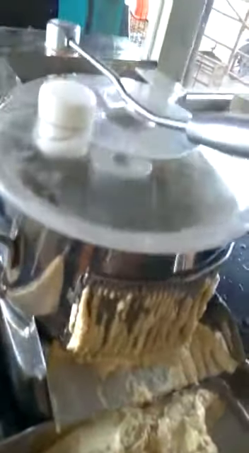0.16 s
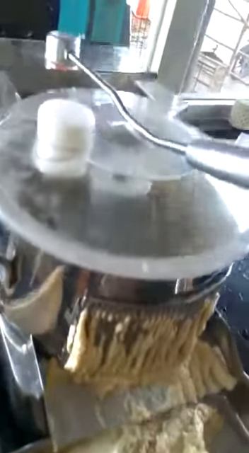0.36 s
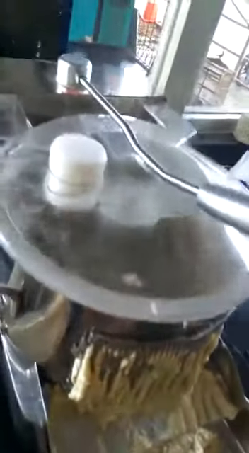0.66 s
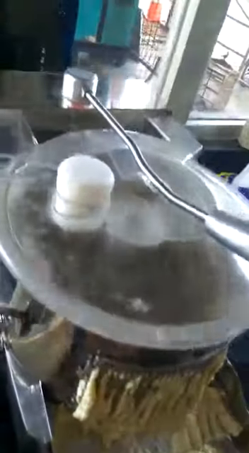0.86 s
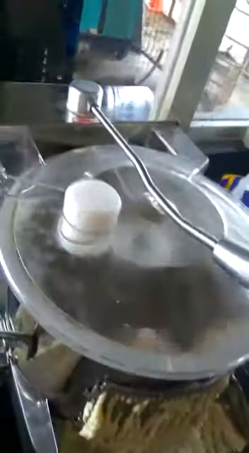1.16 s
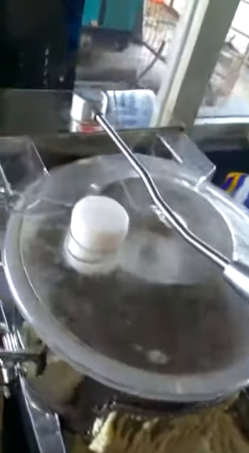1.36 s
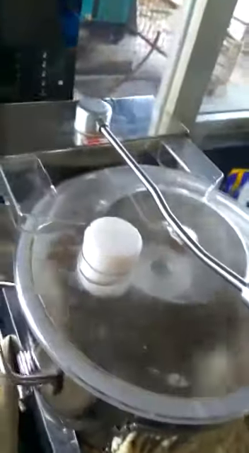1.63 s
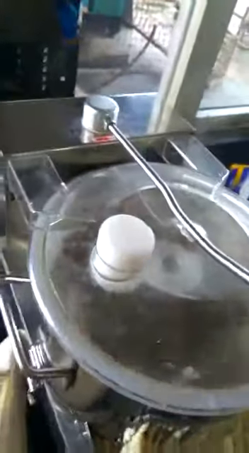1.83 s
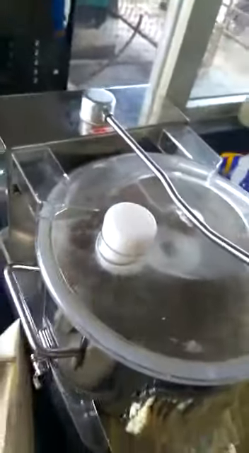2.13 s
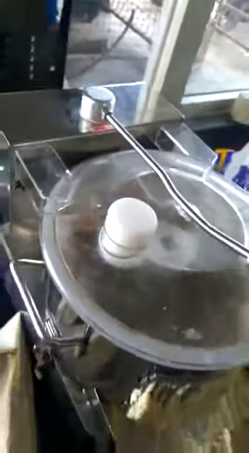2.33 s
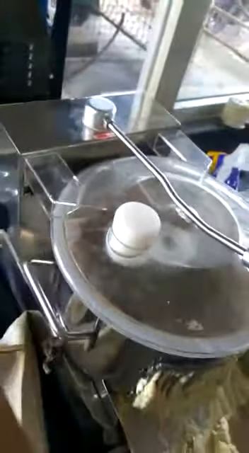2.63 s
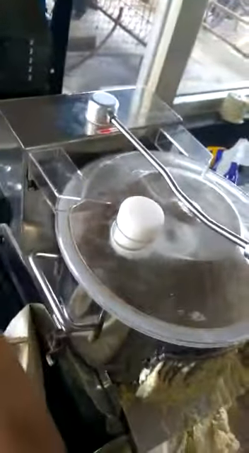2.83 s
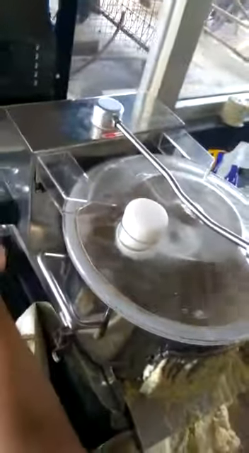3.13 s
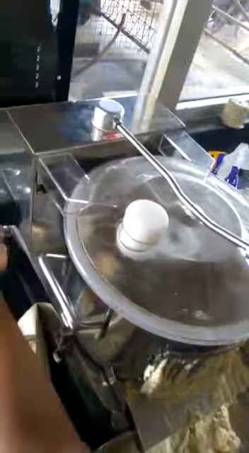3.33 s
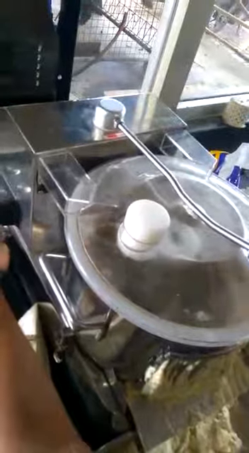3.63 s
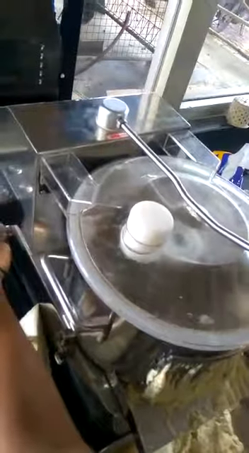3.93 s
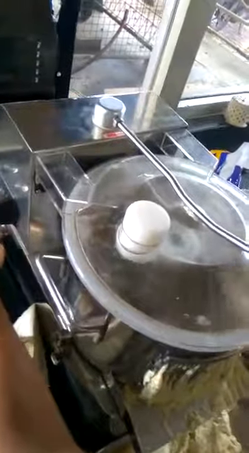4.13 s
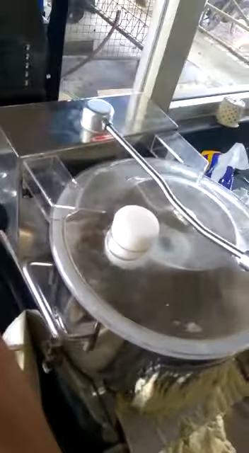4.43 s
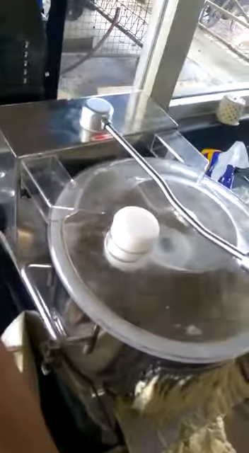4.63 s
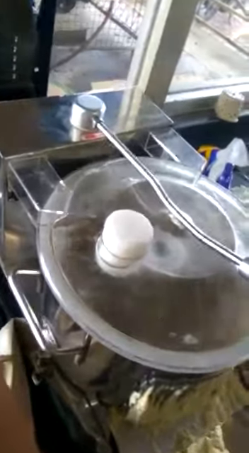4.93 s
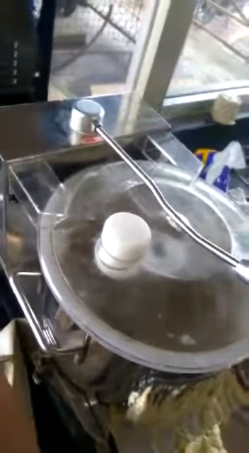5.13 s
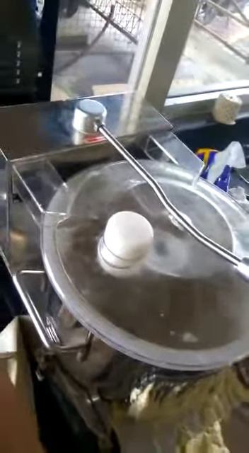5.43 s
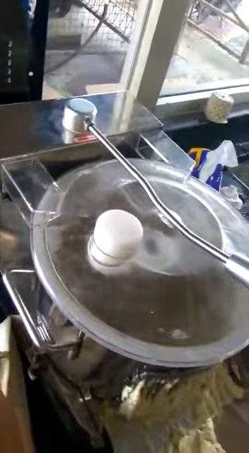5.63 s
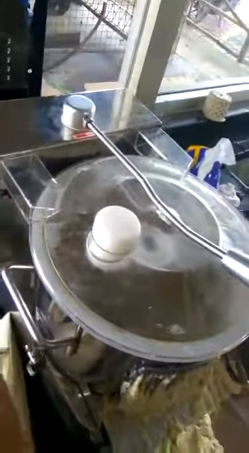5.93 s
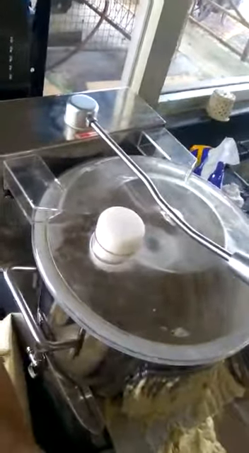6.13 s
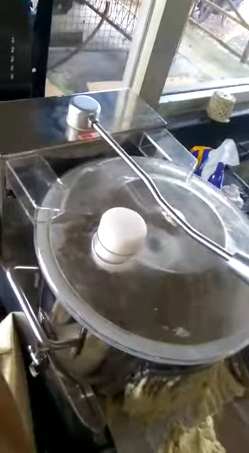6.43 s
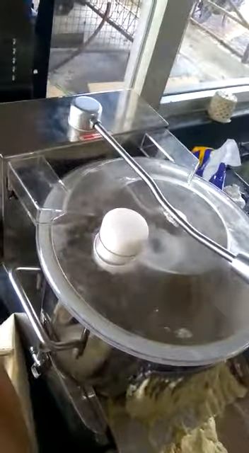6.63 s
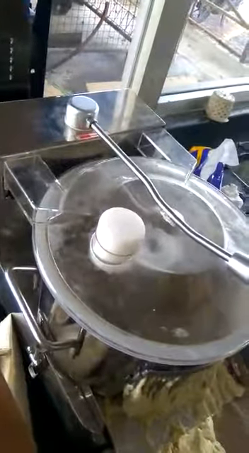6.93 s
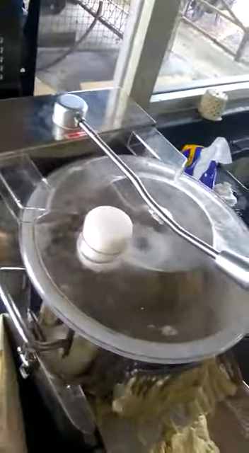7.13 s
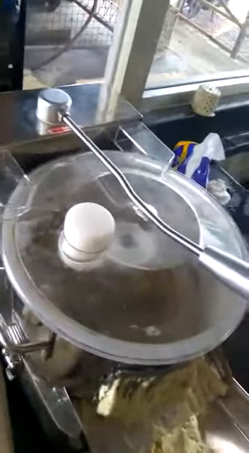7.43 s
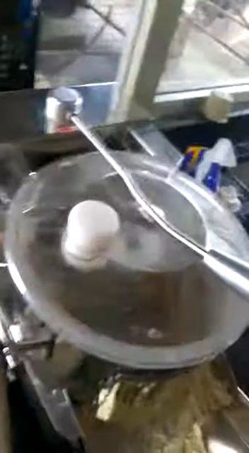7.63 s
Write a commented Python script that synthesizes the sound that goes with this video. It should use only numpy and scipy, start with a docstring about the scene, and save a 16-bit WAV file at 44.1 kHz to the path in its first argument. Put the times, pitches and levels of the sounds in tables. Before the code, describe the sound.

Wet pulp tumbles, slaps and ticks inside a ringing steel drum over the loud low hum of a nearby motor, and the housing booms now and then. The load grows quieter, leaving mostly hum. After a few last knocks the machine is switched off with a click and dies away at once. A small metallic snap follows, then only a quiet room with distant traffic and a very faint electronic whine.

```python
"""In a quiet room, a mains motor turns a paddle that pushes pulp through a screen in a steel drum.
The motor's coils hum at multiples of the mains frequency and its gears whirr. Lumps tumble and knock,
making the drum ring; the housing booms, loose bits clatter, and wet pulp spatters and ticks.
Near the end a switch clicks and the motor stops, leaving distant traffic and a thin electronic whine."""
import sys
import numpy as np
from scipy import signal
from scipy.fft import rfft, irfft, next_fast_len
from scipy.io import wavfile

SR = 44100
rng = np.random.default_rng(int(sys.argv[2]) if len(sys.argv) > 2 else 0)


def file_out(sig):
    """Save sig as 16-bit WAV at sys.argv[1]."""
    # one column per channel
    cols = np.atleast_2d(sig).T
    # limit, then scale
    lim = np.clip(cols, -1, 1)
    pcm = np.round(lim * 32767).astype(np.int16)
    wavfile.write(sys.argv[1], SR, pcm)


N = 343098
OFF_S, RUNDOWN_T60 = 6.711, 0.18  # switch-off; a t60 is the seconds a sound takes to fade by 60 dB
LEAD_S = 0.00016  # the left channel hears the drum first
SWEEP_RISE_S, SWEEP_FALL_S, LURCH_RISE_S = 0.03, 0.033, 0.021

# Table levels are relative: the functions add their own gains. Pan is left level minus right level.
# lumps striking the wall: t/s, level/dB, favoured f/Hz, slap compared with the knock/dB
KNOCKS = [(0.123, -16, 845, -12), (0.16, -13.5, 850, -12), (0.237, -15.5, 730, -16), (0.268, -16, 875, -14),
          (0.296, -20, 520, -17), (0.401, -8.5, 570, -7), (0.404, -8, 1020, -16), (0.489, -20.5, 457, -15),
          (0.494, -8.5, 810, -10), (0.55, -17.5, 540, -3.5), (0.582, -24, 537, 1.5),
          (0.667, -14.5, 610, -9), (0.706, -10.5, 860, -18), (0.768, -14, 840, -20), (0.82, -17, 544, -13),
          (0.855, -11, 510, -9), (0.916, -12.5, 570, -6), (0.982, -16, 525, -2), (1.02, -26, 565, -18),
          (1.041, -14, 533, -16), (1.081, -13, 674, -16), (1.093, -24, 513, 4), (1.124, -15, 452, -13),
          (1.154, -9, 807, -10), (1.177, -9, 870, -5), (1.241, -5, 554, -30), (1.251, -17, 477, -17),
          (1.299, -11, 477, -12), (1.339, -26, 560, -5), (1.392, -8, 1024, -16), (1.397, -10, 498, -10),
          (1.483, -35, 660, -12), (1.517, -11, 800, -20), (1.538, -15, 820, -12), (1.599, -17, 530, -17),
          (1.83, -7, 488, -9), (1.879, -13, 744, -16), (1.996, -17, 550, -16), (2.056, -13, 507, -12),
          (2.255, -12, 537, -12), (2.295, -11, 483, -15), (2.41, -12, 770, -15.5), (2.46, -13.5, 820, -11),
          (2.504, -36, 514, -11), (2.539, -13, 560, -23), (2.592, -16, 592, -4), (2.673, -9.5, 516, -20),
          (2.723, -12, 510, -27), (2.802, -14, 493, -25), (2.832, -15, 474, -25), (3.024, -10, 543, -10.5),
          (3.066, -7, 466, -20), (3.078, -9, 514, -18), (3.135, -19, 495, -23), (3.198, -13.5, 535, -11),
          (3.34, -10.5, 546, -15), (3.532, -17, 455, -23), (3.584, -8, 805, -19), (3.674, -12, 805, -19),
          (3.752, -15, 506, -15), (3.8, -15, 810, -20), (3.853, -10, 484, -24), (3.882, -6.5, 505, -22),
          (4.028, -8.5, 560, -20), (4.116, -16, 493, -9), (4.137, -13, 517, -14), (4.199, -17, 696, -3),
          (4.283, -13.5, 814, -18), (4.328, -15.5, 813, -14), (4.358, -17, 820, -8), (4.409, -13, 870, -12),
          (4.464, -13, 830, -9), (4.497, -17, 487, -8), (4.552, -11.5, 500, -25), (4.582, -10.5, 500, -25),
          (4.623, -21, 785, -16), (4.713, -21, 520, -4), (4.766, -17, 520, -15), (5.034, -21, 444, -17),
          (6.644, -18, 480, -27), (6.659, -15, 565, -27), (6.689, -16, 503, -14)]
# the tones at which the steel drum rings: f/Hz, width/Hz, level/dB
DRUM_MODES = [(250.4, 20, -3.5), (274.2, 21, 4.5), (300.5, 16, 2.5), (364.2, 11.8, 3), (385.4, 11, -6.5),
              (417, 35.5, -2.5), (458, 42.5, -1), (537, 37, 2.5), (706, 67, -5), (793.3, 21.5, 0),
              (846, 66, -6.5), (984, 71, -5), (1188, 225, -12.5), (1460, 710, -23), (2190, 480, -26)]
# how much pulp is in the drum, heard between sweeps: t/s, level/dB
LOAD = [(0, -0.5), (1.3, 3.5), (2.1, 2.5), (3.4, 1), (4.4, 1), (4.75, -0.5), (5.1, -7), (6.1, -7.5),
        (6.7, -6.5)]
# the paddle sweeps pulp round the wall: t/s, tumbling level/dB, spatter level/dB
SWEEPS = [(0.037, -20.5, -37.5), (0.15, -23, -37.5), (0.297, -23, -39), (0.411, -23.5, -42.5),
          (0.505, -21, -41.5), (0.609, -27, -41), (0.712, -25.5, -43), (0.821, -22, -41),
          (0.927, -23, -40.5), (1.047, -24, -37), (1.169, -20, -36.5), (1.1, -18.5, -39.5),
          (1.253, -18, -38.5), (1.3, -22, -41), (1.401, -24.5, -43.5), (1.517, -23, -40.5),
          (1.669, -21.5, -38), (1.759, -19.5, -40.5), (1.868, -19, -35.5), (2.023, -20.5, -42.5),
          (2.179, -28, -58), (2.305, -21.5, -42.5), (2.41, -25.5, -41.5), (2.558, -20.5, -42),
          (2.694, -21, -43), (2.804, -22, -41.5), (2.914, -27, -44.5), (3.077, -20, -40), (3.294, -24, -46),
          (3.361, -21, -39.5), (3.478, -23, -47.5), (3.613, -20.5, -42), (3.804, -29, -47.5),
          (3.885, -20, -37.5), (4.022, -24, -44), (4.153, -22, -45), (4.292, -23.5, -45.5),
          (4.423, -22, -40.5), (4.588, -25.5, -41.5), (4.733, -28.5, -69.5), (4.895, -30.5, -57),
          (5.042, -52, -59), (5.2, -43, -54), (5.399, -29, -52.5), (5.964, -38, -52), (6.4, -46, -58),
          (6.665, -39, -51)]
# the mass of pulp lurches: t/s, level/dB
LURCHES = [(0.0, -13.5), (0.43, -36), (0.58, -44), (0.72, -17), (1.21, -14), (1.47, -19), (1.871, -28),
           (2.12, -24), (2.441, -10), (2.53, -18), (2.64, -22), (2.72, -25), (3.034, -14.5), (3.12, -18),
           (3.341, -15), (3.831, -23), (3.89, -20), (4.02, -25), (4.44, -25), (4.63, -26), (4.76, -23.5),
           (5.05, -34), (5.761, -34), (5.92, -23), (6.685, -20)]


def hum():
    """The coils' magnetic pull hums at multiples of the mains frequency and collapses at switch-off."""
    # loudness of the hum: t/s, level/dB
    loudness = [(0, -13.5), (.2, -12.5), (.5, -14.5), (.9, -15), (1.05, -12), (1.48, -16.5), (1.65, -12.5),
                (1.75, -16), (2.5, -16), (2.78, -17), (2.9, -16.5), (3.7, -18), (3.88, -17), (4.2, -19),
                (4.6, -16.5), (4.75, -17.5), (5.4, -15), (5.56, -17.5), (6.05, -15.5), (6.7, -16.5)]
    # weak tones beside the strong fourth multiple: multiple of the mains, level/dB
    overtones = [(1, -40.5), (2, -36), (3, -23.5), (5, -30), (6, -23), (7, -20), (8, -19.5), (11, -31.5),
                 (14, -28.5), (15, -52)]
    # the microphone swings round the motor: t/s, left lead/radians, pan/dB
    swing = [(0, .13, .3), (1.3, .2, .4), (1.8, .26, 1.2), (3.2, .33, 1.0), (7, .34, 1.3)]
    mains_hz, side = 49.98, np.array([[.5], [-.5]])
    phase = 2 * np.pi * mains_hz * np.arange(N) / SR
    weak = 0
    for k, db in overtones:
        weak += amp(db + 2.14 * wander(19)) * np.sin(k * phase + 0.9 * wander(8) + 2 * np.pi * rng.random())
    weak = np.array([weak, np.roll(weak, round(LEAD_S * SR))])
    strong = np.sin(4 * phase + side * curve(swing)) * pan(curve(swing, column=2))
    level = np.sqrt(2) * amp(curve(loudness) + 0.6 * wander(9))
    collapse = rundown(t60=0.04)
    room_tail = amp(-7) * (rundown(t60=0.33) - collapse)
    return level * (collapse + room_tail) * (strong + amp(-1.5) * weak)


def drum(tumbling):
    """Tumbling pulp and single lumps make the drum ring; the wall under each lump also thuds."""
    tumble = tumbling * np.sqrt(0.5 + 0.5 * bumps(per_s=170, spread_db=2.6, fall_s=0.0052))
    blows, thuds, t = np.zeros((2, N)), np.zeros(N), np.arange(800) / SR
    for s, db, hz, _ in KNOCKS:
        tone = np.sin(2 * np.pi * hz * t)  # where a lump lands favours the drum tones near hz
        wet_scatter = 1.5 * rng.standard_normal((2, len(t))) * np.exp(-t / 0.0055)
        add_at(blows, s, amp(db - 14.5) * (tone * np.exp(-t / 0.003) + wet_scatter))
        add_at(thuds, s, amp(db - 5) * fade(t, t60=0.045) * tone)
    shell = stereo_noise(tumble, lambda hz: modes(DRUM_MODES, hz), (230, 1500), LEAD_S, blows)
    return shell + thuds * pan(0.8)


def stirring():
    """How hard the pulp tumbles: more at each sweep, less while a lump flies towards the wall."""
    stirred = swells(SWEEPS, curve(LOAD) - 29, SWEEP_RISE_S, SWEEP_FALL_S)
    flight_s, dip_depth = 0.015, 0.37
    landings = np.zeros(N)
    landings[(np.array(KNOCKS)[:, 0] * SR).astype(int)] = 1
    dip = np.sin(np.pi * np.linspace(0, 1, round(flight_s * SR)) ** 2)
    in_flight = signal.oaconvolve(landings, dip)[len(dip) - 1:]  # each dip ends at its knock
    return stirred * (1 - dip_depth * np.minimum(in_flight, 1))


def boom():
    """The housing rumbles under the load, swells at each lurch and rings on after switch-off."""
    # the low tones of the housing: f/Hz, width/Hz, level/dB
    housing_modes = [(85.2, 6, -12), (151, 11.2, -1), (169.4, 11.6, 4.5), (180.9, 20.1, 2.5),
                     (222, 23, -6.5)]
    steady_db = -24.5 + 0.87 * curve(LOAD)
    lurches = np.array(LURCHES) + [0, -5]  # the rumble sits 5 dB under the listed levels
    level = swells(lurches, steady_db, LURCH_RISE_S, fall_s=0.03, t60=0.55)
    return stereo_noise(level, lambda hz: modes(housing_modes, hz), (135, 188))


def thumps():
    """Each lurch rocks the housing: a low tone that swells quickly and dies."""
    out, t = np.zeros(N), np.arange(SR // 4) / SR
    centre_hz, rise_s = 169, 0.012
    shape = amp(3.5) * (1 - np.exp(-t / rise_s)) * fade(t, t60=0.29)
    for s, db in LURCHES:
        hz = centre_hz * rng.uniform(0.97, 1.03)
        tone = np.sin(2 * np.pi * (hz * t + rng.random()))
        add_at(out, max(s - LURCH_RISE_S, 0), amp(db) * shape * tone)
    return out


def slaps():
    """The wet face of each lump slaps the wall: a short burst of noise on top of the knock."""
    out, t = np.zeros((2, N)), np.arange(2600) / SR
    wet = signal.butter(2, [750, 1900], "bandpass", fs=SR)
    shape = fade(t, t60=0.055) * np.minimum(t / 0.0015, 1)
    for s, db, _, slap_db in KNOCKS:
        a, b = rng.standard_normal((2, len(t)))
        burst = signal.lfilter(*wet, [a + 0.1 * b, 0.5 * a + 1.1 * b])  # partly alike left and right
        add_at(out, s, amp(db + slap_db + 6.5) * shape * burst)
    return out


def clatter(tumbling):
    """Loose bits tap one thin part at a time, left or right; each knock jolts all parts at once."""
    # thin parts that ring: f/Hz, level/dB, t60/s
    thin_parts = [(846, 6, 0.038), (1011, -13, 0.15), (1240, -1, 0.053), (1342, 2, 0.021),
                  (1610, -11, 0.037), (1810, -16, 0.039), (2090, -29, 0.021), (2360, -14.5, 0.037)]
    out, t = np.zeros((2, N)), np.arange(2500) / SR
    taps_per_s, count = 260, 2 * len(thin_parts)  # one set of parts on each side
    tap_db = -8.5 + 0.23 * curve(LOAD) + 3.6 * np.minimum(rng.exponential(1, N), 3)
    tap_sizes = tumbling * amp(tap_db) * (rng.random(N) < taps_per_s / SR)
    part_hit = rng.integers(0, count, N)
    knock_s, knock_db, _, _ = np.transpose(KNOCKS)
    jolt_db = knock_db - 23 + rng.uniform(-2, 2, len(KNOCKS))
    jolts = amp(jolt_db)[:, None] * rng.uniform(0.15, 0.46, (len(KNOCKS), count))
    for k, (hz, db, t60) in enumerate(thin_parts + thin_parts):
        taps = tap_sizes * (part_hit == k)
        taps[(knock_s * SR).astype(int)] += jolts[:, k]
        ring = amp(db) * fade(t, t60) * np.sin(2 * np.pi * hz * t)
        out[k // len(thin_parts)] += signal.oaconvolve(taps, ring)[:N]
    return out + 0.5 * out[::-1]  # each side also hears the other


def spatter():
    """Wet pulp hits the screen as a dense hail of tiny bursts, each pitch band with its own share."""
    # tone colour of the spatter: f/Hz, level/dB
    colour = [(880, -5), (1500, 2.5), (2040, -5.5), (3090, -7), (6760, -11), (8160, -12), (9750, -18.5),
              (10700, -18.5), (14200, -28), (16000, -37)]
    # edges of the bands that splats land in: f/Hz
    edges = [1200, 3200, 9500, 16000]
    # loudness of the highest band: t/s, level/dB
    top_band = [(0, -0.5), (1.4, 4.5), (1.9, -1), (2.2, 2.5), (4, 1.5), (4.8, 1), (6.7, -1.5)]
    steady_db, splats_per_s = -47.5 + 0.81 * curve(LOAD), 83
    thrown = swells(SWEEPS, steady_db, SWEEP_RISE_S, SWEEP_FALL_S, column=2)
    shared = bumps(splats_per_s, spread_db=2.0, fall_s=0.006)
    hail = 0
    for lo, hi in zip(edges, edges[1:]):
        own = bumps(splats_per_s, spread_db=3.5, fall_s=0.008)
        force = np.sqrt(0.5 + 0.33 * shared + 0.37 * own)
        if hi == edges[-1]:  # the highest band swells more than the rest at each sweep
            force *= amp(curve(top_band)) * (thrown / amp(steady_db + 5)) ** 0.28
        band = signal.butter(3, [lo, hi], "bandpass", fs=SR, output="sos")
        hail += signal.sosfilt(band, force * rng.standard_normal((2, N)))
    blows = thrown * unit_level(hail)
    return stereo_noise(0, lambda hz: amp(at_pitch(colour, hz)), (2480, 12000), LEAD_S, blows)


def ticks():
    """The pulp ticks: each tick is a short crack of bright noise with a brief ring."""
    # sharp ticks: t/s, level/dB, pan/dB, ring f/Hz
    events = [(0.057, -17.5, 7, 6460), (.1386, -24, 9, 3580), (.158, -22, 5, 6500), (.176, -27, 5, 5000),
              (.2558, -19, 2, 3640), (.281, -22, 4, 3500), (.32, -24, 4, 6500), (.4, -15, 7, 4140),
              (.417, -19, 5, 7500), (.4888, -30, .5, 4047), (.525, -21, 5, 6500), (.668, -21, 7, 7000),
              (0.71, -16.5, 7, 3870), (0.86, -18.5, 9, 3750), (1.0065, -20, 5, 4260), (1.038, -17, 9, 7390),
              (1.3917, -23, 7, 6980), (1.487, -24, 4, 5890), (1.6501, -24, 12, 4410),
              (1.751, -12.5, 8, 6860), (1.767, -17, 3, 6000), (1.7835, -16, 6, 6930),
              (1.8304, -16, 8, 8000), (1.8517, -18, 16, 5220), (1.921, -20, 10, 9000), (1.96, -17, 8, 7900),
              (2.023, -20.5, 9, 5580), (2.141, -21, 8, 6500), (2.176, -19.5, 6, 6490),
              (2.184, -22, 7, 7000), (2.2553, -24, 9, 4470), (2.288, -22, 9, 7000), (2.3018, -16, 13, 7200),
              (2.41, -21, 15, 4070), (2.5383, -26, 12, 4090), (2.6424, -27, 5, 3800), (2.667, -19, 4, 5550),
              (2.696, -18, 3, 7760), (2.793, -22, 12, 5770), (2.942, -22, 3, 5150), (3.064, -21, 7, 7000),
              (3.081, -21, 5, 8000), (3.199, -30, 5, 7500), (3.228, -31, 5, 7000), (3.2849, -25, 4, 5950),
              (3.305, -20.5, 10, 7020), (3.357, -17, 6, 4980), (3.371, -21, 4, 7500), (3.482, -24, 5, 6500),
              (3.637, -27, 5, 7800), (3.652, -19, 7, 7500), (3.88, -7.5, 6, 6740), (3.896, -15, 6, 8000),
              (4.004, -19, 2, 6880), (4.142, -22, 3, 5000), (4.1849, -21, 7, 3990), (4.204, -23.5, 7, 6000),
              (4.4055, -24, 9, 5820), (4.894, -18.5, 1, 3740), (4.934, -24.5, 3, 6000),
              (4.95, -30, 3, 7000), (5.421, -36, 3, 6500), (5.706, -28, 7, 6000)]
    out, t = np.zeros((2, N)), np.arange(3000) / SR
    bright = signal.butter(3, [2500, 11000], "bandpass", fs=SR)
    shape = fade(t, t60=0.04) * np.minimum(t / 0.0012, 1)
    for s, db, pan_db, hz in events:
        a, b = rng.standard_normal((2, len(t)))
        crack = np.array([a, 0.43 * np.roll(a, 6) + 1.1 * b])
        ring = signal.lfilter(*signal.iirpeak(hz, Q=3.0, fs=SR), crack)
        tick = 0.77 * signal.lfilter(*bright, crack) + 1.28 * ring
        add_at(out, s, amp(db - 11.5) * pan(pan_db) * shape * tick)
    return out


def clack():
    """One hard bit cracks against the wall: a steep pressure spike and a short scatter of noise."""
    out, t = np.zeros((2, N)), np.arange(1000) / SR
    hit_s, spike_s = 1.8302, 0.00015
    spike = -(1 - t / spike_s) * np.exp(-t / spike_s)
    a, b = rng.standard_normal((2, len(t)))
    wide = signal.butter(1, [1200, 9000], "bandpass", fs=SR)
    scatter = signal.lfilter(*wide, [a + 0.4 * b, 0.63 * a - 0.46 * b]) * fade(t, t60=0.014)
    add_at(out, hit_s, amp(-6) * (spike * pan(3) + 0.42 * scatter))
    return out


def gears():
    """Bearings and gears whirr darkly through the drum, whatever the load, until switch-off."""
    dull_hz = 416
    level = amp(-33 + 1.8 * wander(10)) * rundown(RUNDOWN_T60)
    return stereo_noise(level, lambda hz: modes(DRUM_MODES, hz) / (1 + (hz / dull_hz) ** 2),
                        (230, 3000), LEAD_S)


def metal_clicks():
    """A loose bit now and then, and the switch and lever at the end: a dry snap, then a metal ring."""
    # clicks: t/s, snap level/dB, pan/dB, snap t60/s, ring f/Hz, ring level/dB, ring t60/s
    events = [(4.814, -55, 6, .02, 3520, -42, .05), (4.829, -33, 6, .02, 3500, -39, .06),
              (5.992, -53, 6, .02, 1290, -36, 0.11), (6.046, -55, 13, .02, 1250, -37, .08),
              (6.405, -46, 5, .02, 1260, -35, 0.14), (6.539, -55, 1, .02, 1750, -40, 0.055),
              (6.6226, -35, -7, .02, 2520, -38, 0.078), (6.622, -34, 0.5, .02, 4700, -35, 0.022),
              (6.699, -37, .5, 0.16, 4250, -42, .04), (6.9386, -29.5, 2, 0.057, 1210, -37.5, 0.059),
              (6.939, -40, -3, .03, 4600, -42, 0.037), (6.94, -50, 0, .03, 2000, -45, .04),
              (6.948, -55, 4, .03, 705, -43, .06), (7.0372, -36, 8, 0.01, 10800, -38, .01)]
    out, t = np.zeros((2, N)), np.arange(4000) / SR
    bright = signal.butter(2, [2200, 10500], "bandpass", fs=SR)
    for s, db, pan_db, snap_t60, hz, ring_db, ring_t60 in events:
        snap = amp(db) * fade(t, snap_t60) * signal.lfilter(*bright, rng.standard_normal(len(t)))
        ring = amp(ring_db) * fade(t, ring_t60) * np.sin(2 * np.pi * hz * t)
        add_at(out, s, pan(pan_db) * (snap + ring))
    return out


def room():
    """Distant traffic and air, swelling a little, with a faint electronic whine."""
    # tone colour of the traffic and air: f/Hz, level/dB
    colour = [(40, -4), (88, 2), (150, -6), (200, -12.5), (300, -14), (400, -19.5), (1000, -24),
              (2500, -27.5), (6000, -32), (9000, -35), (11500, -41), (13200, -51), (16000, -56)]
    # thin electronic tones: f/Hz, level/dB
    whine_tones = [(6002, -75), (6998, -75), (10002, -79), (14002, -75)]
    # fuzzy high tones: f/Hz, width/Hz, level/dB
    fuzzy_tones = [(10800, 130, -1.5), (14550, 70, -6)]
    air = stereo_noise(amp(-42 + wander(6.4)), lambda hz: amp(at_pitch(colour, hz)), (17, 16000))
    whine, t = 0, np.arange(N) / SR
    for hz, db in whine_tones:
        whine += amp(db) * np.sqrt(2) * np.sin(2 * np.pi * (hz * t + rng.random()) + 1.2 * wander(11))
    whistle = stereo_noise(amp(-64.5), lambda hz: modes(fuzzy_tones, hz), (9000, 16000))
    return air + whine * amp(1.5 * wander(12)) + whistle


def stereo_noise(envelope, colour, band_hz, lead_s=0, blows=0):
    """Noise under an envelope, plus blows, given a tone colour and spread over left and right."""
    # how alike the two sides sound: f/Hz, likeness from 0 to 1
    likeness = [(30, 1), (200, 0.98), (500, 0.66), (800, 0.97), (1400, 0.051), (3000, 0.087),
                (16000, 0.071)]
    # which side each pitch leans to: f/Hz, pan/dB
    balance = [(60, -3), (130, 0.5), (290, -2.5), (640, -1.5), (1410, 4.5), (3100, -2), (6820, 2.5),
               (15000, 0.5)]
    size = next_fast_len(N + SR // 4, real=True)
    hz = np.fft.rfftfreq(size, 1 / SR)
    left, other = rfft(rng.standard_normal((2, N)) * envelope + blows, size)
    same, gain = at_pitch(likeness, hz), colour(hz)
    right = same * left * np.exp(-2j * np.pi * hz * lead_s) + np.sqrt(1 - same ** 2) * other
    pair = np.array([left, right]) * pan(at_pitch(balance, hz))
    inside = (hz > band_hz[0]) & (hz < band_hz[1])  # envelope 1 gives a power near 1 in this band
    band_gain = np.sqrt(np.sum(abs(gain[inside]) ** 2) / len(hz))
    return irfft(pair * gain / band_gain, size)[:, :N]


def modes(table, hz):
    """How strongly a ringing body answers at each frequency; neighbouring tones have opposite signs."""
    return sum((-1) ** k * amp(db) * 1j * hz * width / (f * f - hz * hz + 1j * hz * width)
               for k, (f, width, db) in enumerate(table))


def swells(rows, steady_db, rise_s, fall_s, column=1, t60=RUNDOWN_T60):
    """A base level plus one bell-shaped swell per row, dying away after switch-off."""
    rows, t = np.array(rows), np.arange(0, N, 64) / SR
    since = t - rows[:, :1]
    bells = amp(rows[:, column, None]) ** 2 * np.exp(-(since / np.where(since < 0, rise_s, fall_s)) ** 2)
    power = amp(steady_db) ** 2 + np.interp(np.arange(N) / SR, t, bells.sum(axis=0))
    return np.sqrt(power) * rundown(t60)


def bumps(per_s, spread_db, fall_s):
    """The power of many small impacts: random jumps that die away, 1 on average."""
    sizes = amp(spread_db * np.minimum(rng.exponential(1, N), 3)) ** 2
    hits = sizes * (rng.random(N) < per_s / SR)
    power = signal.lfilter([1], [1, -np.exp(-1 / (fall_s * SR))], hits)
    return power / power.mean()


def wander(rate_hz):
    """A smooth random drift of typical size 1, no faster than rate_hz."""
    t = np.arange(0, N + 256, 256) / SR
    rates = rate_hz * np.geomspace(.05, 1, num=24)
    drift = sum(np.sin(2 * np.pi * (f * t + rng.random())) / np.sqrt(f) for f in rates)
    return np.interp(np.arange(N) / SR, t, unit_level(drift))


def rundown(t60):
    """Gain 1 while the motor runs, dying away after switch-off."""
    return fade(np.maximum(np.arange(N) / SR - OFF_S, 0), t60)


def fade(t, t60):
    """A gain that falls by 60 dB every t60 seconds."""
    return amp(-60 * t / t60)


def amp(db):
    """Turns decibels into a gain."""
    return 10 ** (np.asarray(db) / 20)


def pan(db):
    """Left and right gains, with the left louder by db."""
    return amp(db * np.array([[.5], [-.5]]))


def unit_level(x):
    """Scales a signal to an average power of 1."""
    return x / np.sqrt(np.mean(x ** 2) + 1e-20)


def at_pitch(points, hz):
    """Reads between a table's rows on a pitch (log-frequency) scale."""
    f, value = np.transpose(points)
    return np.interp(np.log(hz + 1), np.log(f + 1), value)


def curve(rows, column=1):
    """Joins a table's points in time with straight lines, one value per sample."""
    rows = np.array(rows)
    return np.interp(np.arange(N) / SR, rows[:, 0], rows[:, column])


def add_at(out, start_s, sound):
    """Mixes a short sound into out, starting at start_s."""
    start = round(start_s * SR)
    out[..., start:start + sound.shape[-1]] += sound


def scene():
    """The machine and the room, mixed in stereo."""
    tumbling = stirring()
    motor = hum() + gears()
    body = drum(tumbling) + boom() + thumps()
    pulp = slaps() + clatter(tumbling) + spatter() + ticks() + clack()
    return motor + body + pulp + metal_clicks() + room()


def record(dry):
    """The microphone drops the deepest bass and rounds off tall peaks; then the top treble is cut."""
    thinned = signal.sosfilt(signal.butter(4, 42, "highpass", fs=SR, output="sos"), dry)
    rounded = 0.9 * np.tanh(thinned / 0.9)
    treble_cut = signal.firwin(511, cutoff=15850, window=("kaiser", 9), fs=SR)
    return signal.oaconvolve(rounded, treble_cut[None], "same")


dry = scene()
out = record(dry)
file_out(out)
```